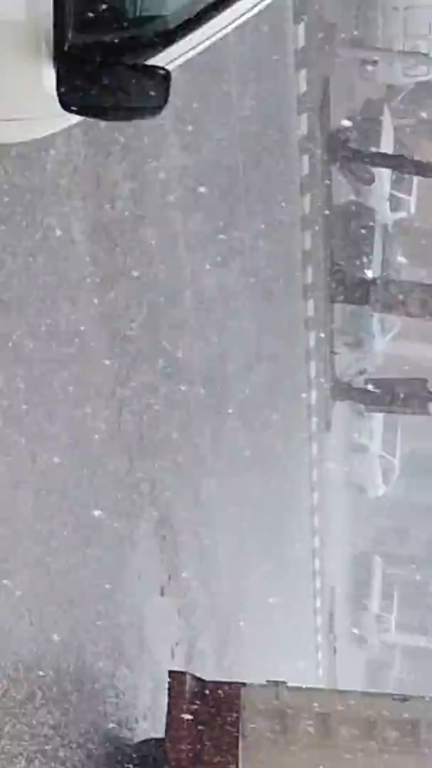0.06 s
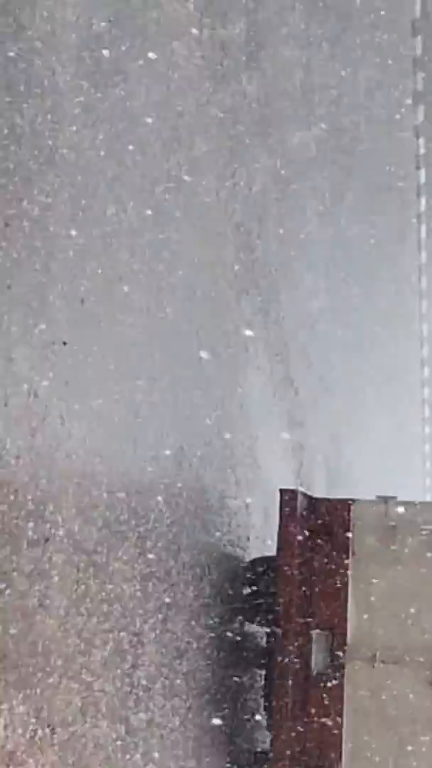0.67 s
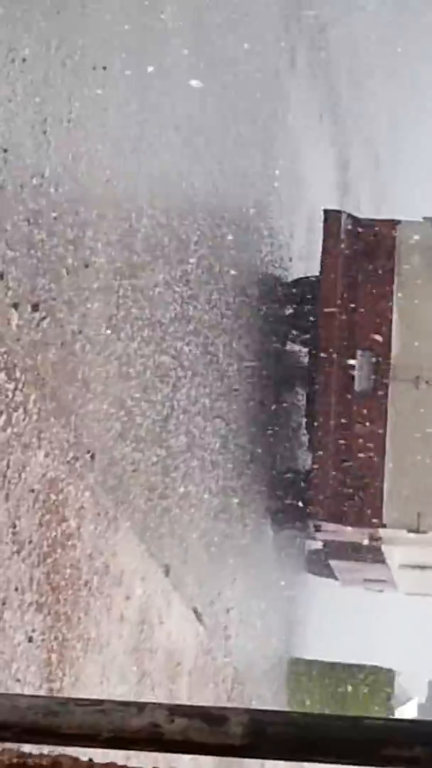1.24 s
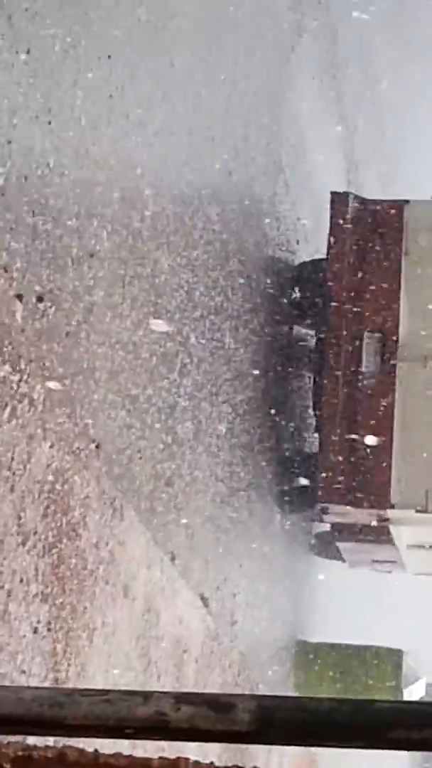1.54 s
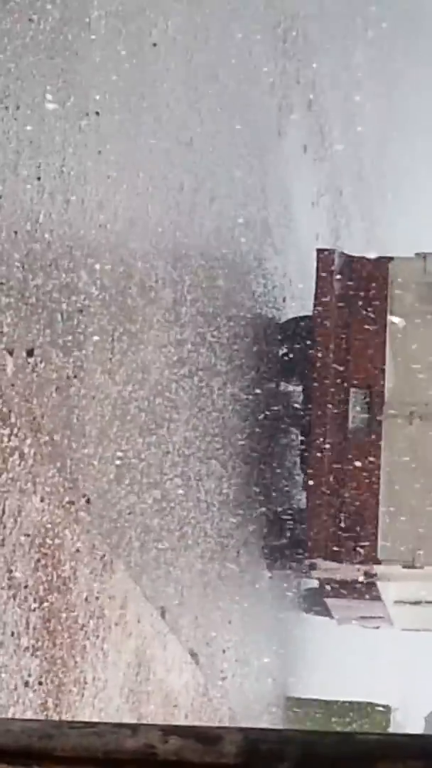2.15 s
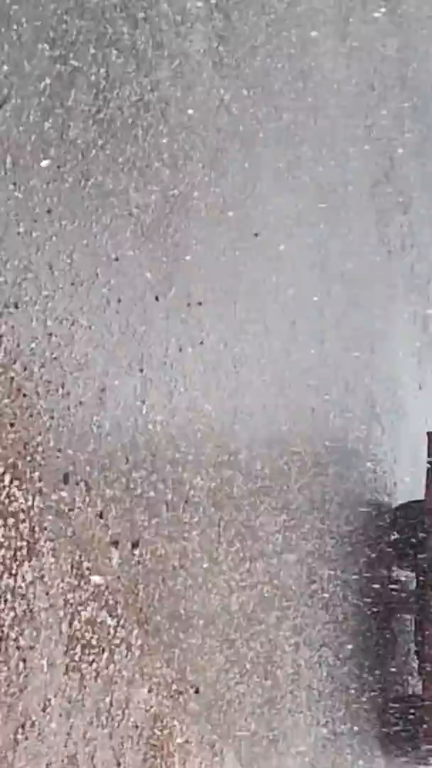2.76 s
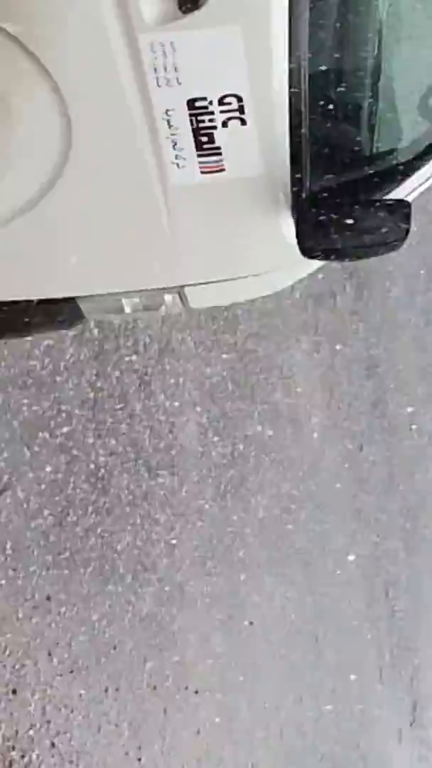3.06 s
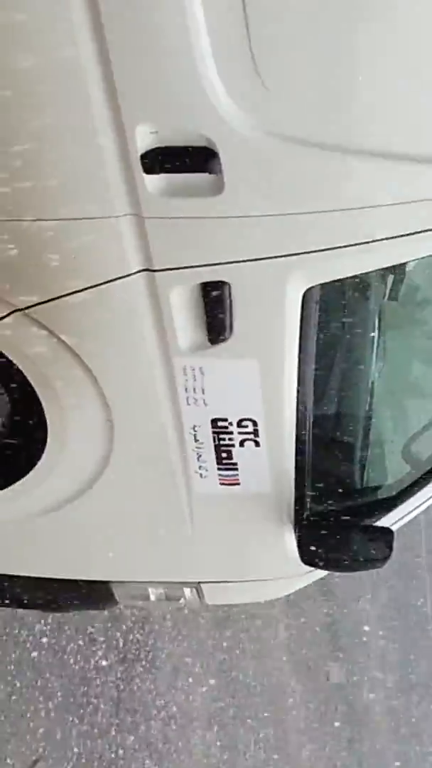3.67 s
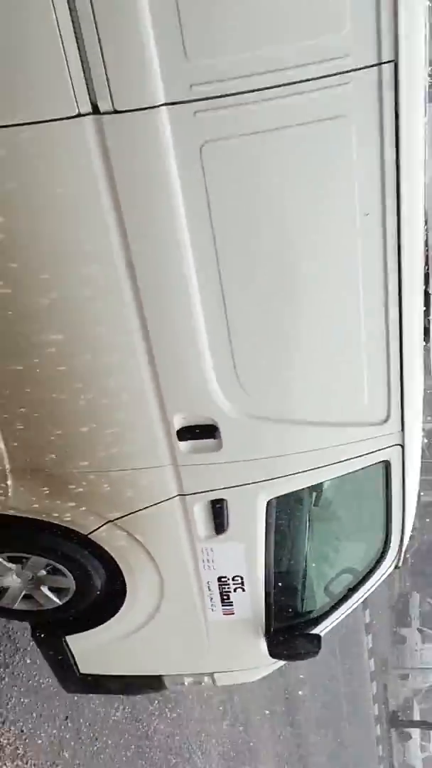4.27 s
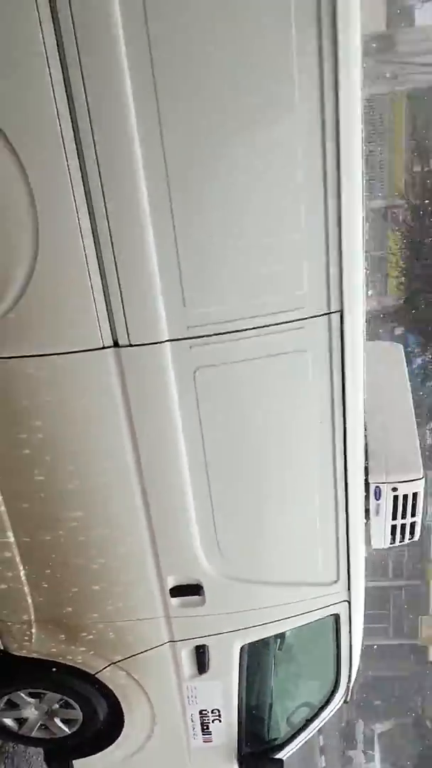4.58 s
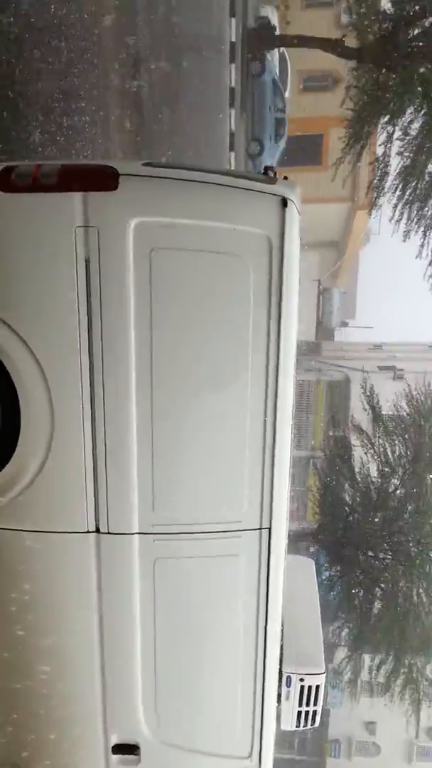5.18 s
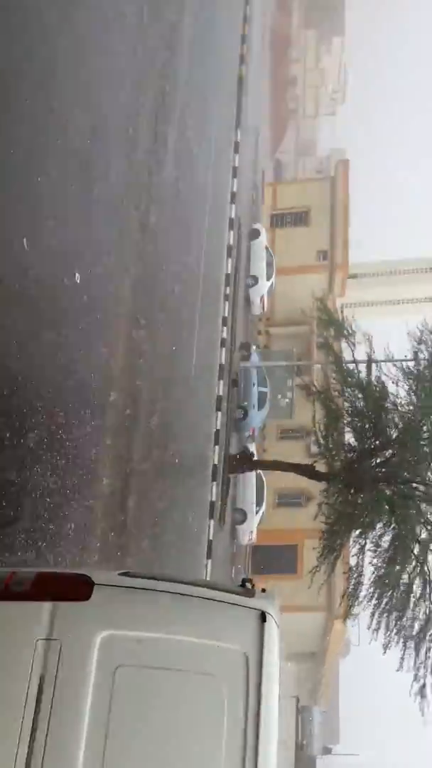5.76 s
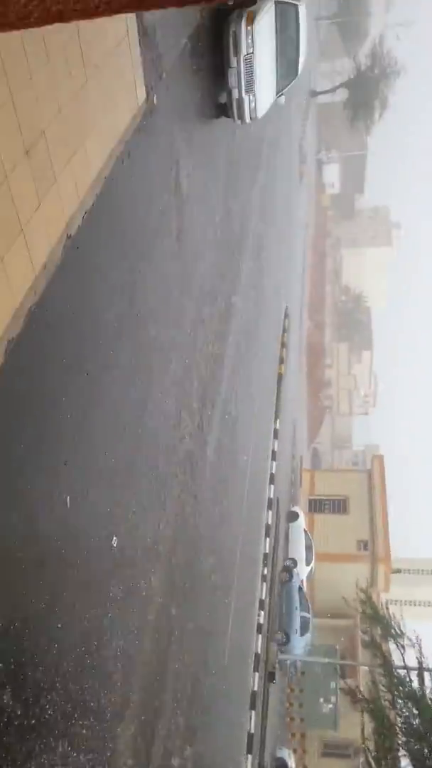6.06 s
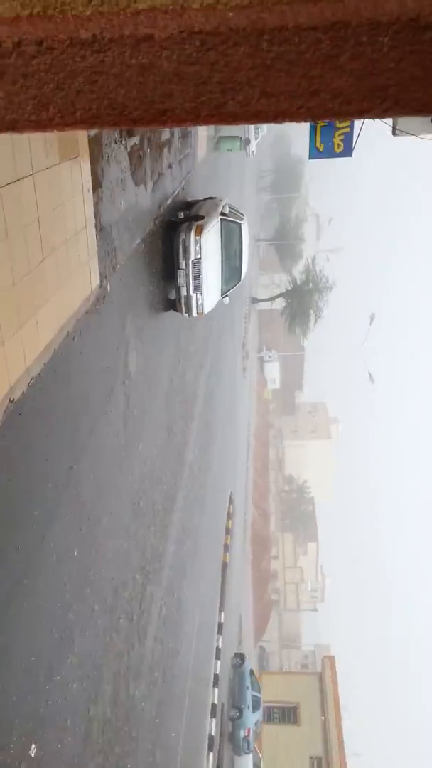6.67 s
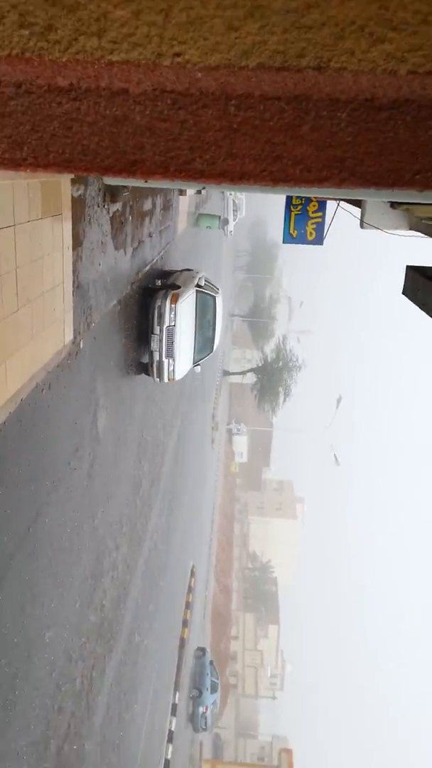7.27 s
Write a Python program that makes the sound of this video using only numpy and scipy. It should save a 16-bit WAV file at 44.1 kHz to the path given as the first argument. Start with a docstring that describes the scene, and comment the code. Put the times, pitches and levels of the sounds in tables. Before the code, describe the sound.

From under a porch, a street is heard in a downpour of hail and rain, with countless stones pattering on the road and on vehicles. Sharp nearby cracks and short metallic knocks stand out, the loudest clipping slightly. As the stereo microphone turns, the right side briefly brightens, the clatter goes a little hollow, then the right opens again. Finally, bright splinters of ice skip across the pavement on the left.

```python
"""Heavy hail and rain on a street, heard from under a porch through two microphones that turn.
From the start, thousands of stones a second crack on asphalt and drum on cars over a wash of rain,
while single stones shatter close by or knock on metal. Near 2.6 s the right side briefly opens to the
street and brightens. From about 3 to 5.5 s the clatter takes on a hollow tone. Then the left side turns
away, the right opens again, and from 6.5 s ice scatters on the left. The loudest cracks overload."""
import sys
import numpy as np
from scipy import signal
from scipy.fft import rfft, irfft, next_fast_len
from scipy.io import wavfile
from scipy.ndimage import uniform_filter1d

SR = 44100
rng = np.random.default_rng(int(sys.argv[2]) if len(sys.argv) > 2 else 0)


def wav_out(sig):
    """Save sig, one row per channel (or a flat mono array), as 16-bit PCM at SR to the path in sys.argv[1]."""
    wavfile.write(sys.argv[1], SR, np.round(np.clip(np.atleast_2d(sig).T, -1, 1) * 32767).astype(np.int16))


N = 323253
TIME = np.arange(N) / SR
TREBLE_LIMIT_HZ = 14800
# how far the right microphone is open to the street: time_s, share (0-1)
RIGHT_OPENING = [(0, 0.22), (.9, 0.03), (2.535, 0), (2.57, 0.97), (3.09, 0.6), (3.3, 0), (5.7, 0.07),
                 (5.77, 1), (6.5, 0.55), (6.9, 0.7), (7.11, 0.95), (7.165, 0.1)]


def gain_of(db):
    """Turns decibels into a number to multiply by."""
    return 10 ** (np.asarray(db) / 20)


def unit_level(x):
    """Scales a signal to an average power of 1."""
    return x / np.sqrt(np.mean(abs(x) ** 2) + 1e-20)


def at_pitch(table, hz, column=1):
    """Looks up a table by pitch, gliding between its rows."""
    columns = np.transpose(table)
    return np.interp(np.log(hz + 1), np.log(columns[0]), columns[column])


def at_time(table, t, column=1):
    """Looks up a table by time, gliding between its rows."""
    columns = np.transpose(table)
    return np.interp(t, columns[0], columns[column])


def band(hz, centre_hz, width=0.5):
    """A bell-shaped gain that favours pitches near the centre."""
    return np.exp(-np.log((hz + 1) / centre_hz) ** 2 / width)


def filtered(x, gain):
    """Turns each frequency up or down by gain(hz)."""
    size = next_fast_len(x.shape[-1], True)
    hz = np.fft.rfftfreq(size, 1 / SR)
    return irfft(rfft(x, size) * gain(hz), size)[..., :x.shape[-1]]


def wander(shape, steps):
    """A random curve that drifts over the given number of steps."""
    return unit_level(uniform_filter1d(rng.standard_normal(shape), size=steps, axis=-1))


def add(mix, start_s, sound):
    """Adds a stereo sound to the mix."""
    part = mix[:, round(start_s * SR):][:, :sound.shape[1]]
    part += sound[:, :part.shape[1]]


def impacts(per_s, spread_db):
    """Start samples and sizes of random hits, many small and a few large."""
    chance = rng.random(N)
    starts = np.flatnonzero(chance < per_s / SR)
    strength = -np.log(chance[starts] * SR / per_s + 1e-9)
    return starts, gain_of(spread_db * np.minimum(strength, 4))


def shower(stones, per_s, spread_db):
    """Plays one of the stone sounds, picked by chance, at every hit."""
    out, pick = np.zeros((2, N)), rng.integers(0, len(stones), N)
    for start, size in zip(*impacts(per_s, spread_db)):
        add(out, start / SR, size * stones[pick[start]])
    return unit_level(out)


def far_rain():
    """Countless distant drops blur into a hiss."""
    return rng.standard_normal((2, N))


def road(per_s=2800, crack_s=0.0013, echo=0.63, echo_s=0.0089, tone=0.28, ring_cycles=14):
    """Each stone on the asphalt gives a sharp crack, a short ring and a spray of echoes."""
    t, stones = np.arange(1200) / SR, []
    for hz in np.geomspace(1500, 9000, 90):
        fade = np.exp(-t / crack_s) + echo * np.exp(-t / echo_s)
        crack = rng.standard_normal((2, len(t))) * fade
        ring = np.sin(2 * np.pi * (hz * t + rng.random((2, 1)))) * np.exp(-t * hz / ring_cycles)
        stones.append(unit_level(crack) + tone * np.sqrt(hz / 4000) * unit_level(ring))
    return shower(stones, per_s, spread_db=3)


def car_panels(per_s=450, ring_cycles=5.9, count=80):
    """Stones hit roofs and bonnets; each patch of sheet metal rings for a few cycles."""
    t, hz = np.arange(3000) / SR, np.geomspace(250, 2200, count)[:, None, None]
    tones = np.sin(2 * np.pi * (hz * t + rng.random((count, 2, 1))))
    return shower(hz * tones * np.exp(-t * hz / ring_cycles), per_s, spread_db=0)


def pellets(per_s=420, click_s=0.00055, bounce=0.61, count=70):
    """Hard pellets a few steps away give a dry click and bounce once."""
    t, stones = np.arange(2400) / SR, []
    pitches = np.geomspace(3000, 12000, count)  # small pellets are brighter
    gaps, pans = rng.uniform(.003, .025, count), rng.uniform(.15, 2.0, count)
    for hz, gap_s, pan in zip(pitches, gaps, pans):
        hits = np.exp(-t / click_s) + bounce * (t > gap_s) * np.exp(-abs(t - gap_s) / click_s)
        click = filtered(hits * rng.standard_normal(len(t)), lambda f: band(f, hz))
        stones.append(np.sqrt(hz) * np.outer([np.cos(pan), np.sin(pan)], unit_level(click)))
    return shower(stones, per_s, spread_db=2.5)


def microphone_pair(spectrum, hz, bass_share=0.73, bass_hz=1200, side_share=0.26, lag_s=15 / SR):
    """Low sounds reach both microphones alike; clatter from the side reaches the left first."""
    left, right = spectrum
    side = side_share * band(hz, centre_hz=2700) * np.exp(-2j * np.pi * hz * lag_s)
    shared = bass_share / (1 + (hz / bass_hz) ** 4) + side
    shared = (shared / np.maximum(abs(shared), 1))[:, None]
    separate = np.sqrt(np.maximum(1 - abs(shared) ** 2, 0))
    return np.array([left, shared * left + separate * right])


def turning_db(hz, t, treble, bass_shade=0.43, turn_share=0.7):
    """Left and right level changes as the microphones turn."""
    # the left microphone turns away from the road: time_s, level_db
    left_shade = [(5.71, 0), (5.86, -2.5), (6.45, -2.5), (6.7, -5.5), (7, -2.5), (7.33, -0.5)]
    # what the right microphone gains when fully open: pitch_hz, level_db
    open_colour = [(90, -4), (300, 0.5), (900, -0.5), (1400, 2), (2300, 5), (3500, 3.5), (5500, 9),
                   (10500, 10), (14000, 21)]
    shade_db = at_time(left_shade, t)
    left_db = (bass_shade * (1 - treble) + treble) * shade_db  # low sounds bend round obstacles
    right_db = at_pitch(open_colour, hz)[:, None] * at_time(RIGHT_OPENING, t)
    clatter = band(hz, centre_hz=2250, width=0.1)[:, None]
    right_db -= turn_share * clatter * shade_db  # as the left turns away, the right faces the road
    return np.array([left_db, right_db])


def flurries_db(hz, t, treble, patchy_db=0.78, flurry_db=0.35, drum_db=0.83, sizzle_db=1.5):
    """The downpour swells and eases; its highest sizzle flickers most."""
    # slow strength of the downpour: time_s, car_drumming_db, road_clatter_db
    strength = [(0, -0.5, -1.1), (.4, -0.5, -1.1), (1, -1.2, -1.36), (1.8, 0, -1.04), (2.48, -1.5, -3),
                (2.62, 1, -2), (3.25, -1, -1), (3.9, -2.5, -1.4), (4.8, 0, -0.9), (5.6, 0.5, -0.8),
                (6, -1.5, -2.5), (6.55, 0.1, 0.4), (6.72, -2.5, -1.4), (7.02, .3, -1.2), (7.33, -1.5, -1.7)]
    patches = wander((len(hz), len(t)), steps=12)
    patches = unit_level(uniform_filter1d(patches, size=10, axis=0))  # nearby pitches move together
    flurries, drumming, sizzle = (wander(len(t), steps) for steps in (20, 36, 22))
    top = (hz ** 8 / (hz ** 8 + 11000 ** 8))[:, None]
    swell_db = (1 - treble) * (at_time(strength, t) + drum_db * drumming)
    swell_db += treble * at_time(strength, t, column=2)
    return swell_db + flurry_db * flurries + patchy_db * patches + sizzle_db * top * (sizzle + patches)


def unsteady_bass(sound, depth_db=6, below_hz=135):
    """The deepest rumble comes and goes a few times a second."""
    rumble = filtered(sound, lambda f: 1 / (1 + (f / below_hz) ** 8))
    swing = unit_level(uniform_filter1d(wander(N, steps=5000), size=1500))
    swell = unit_level(gain_of(depth_db * np.minimum(swing, 1)))
    return sound + rumble * (swell - 1)


def downpour(level_db=-12.5, rain_db=-.5, panel_db=-15.5, pellet_db=-10, treble_hz=1400):
    """Rain and hail all along the street merge into one swelling clatter."""
    # tone of the street at the two microphones: pitch_hz, left_db, right_db
    street = [(20, -50, -78), (87.5, -48, -30.5), (164, -23.5, -18), (297, -10, -9), (590, -9.5, -7.5),
              (780, -7, -5), (1280, -7.5, -6.5), (1970, -2.5, -6), (2700, 0, -5.5), (3430, -1.5, -3.5),
              (4600, -1.5, -7), (5880, -6.5, -15.5), (8930, -10.5, -19), (11070, -16.5, -24.5),
              (15000, -22, -51)]
    sound = gain_of(rain_db) * far_rain() + road()
    sound += gain_of(panel_db) * car_panels() + gain_of(pellet_db) * pellets()
    hz, t, spectrum = signal.stft(sound, SR, nperseg=512, noverlap=384)
    power = uniform_filter1d((abs(spectrum) ** 2).mean((0, 2)), size=3)
    spectrum /= np.sqrt(power)[:, None]  # all pitches equally strong, ready for the street's tone
    spectrum = microphone_pair(spectrum, hz)
    treble = (hz ** 4 / (hz ** 4 + treble_hz ** 4))[:, None]
    spectrum *= gain_of(flurries_db(hz, t, treble) + turning_db(hz, t, treble))
    sound = signal.istft(spectrum, nperseg=512, noverlap=384)[1][:, :N]
    sound = filtered(sound, lambda f: gain_of([at_pitch(street, f), at_pitch(street, f, column=2)]))
    return gain_of(level_db) * unit_level(unsteady_bass(sound))


def hollow_colour(per_s=120):
    """From about 3 to 5.5 s the clatter takes on a hollow tone near 400, 890 and 1650 Hz."""
    # the peaks of the hollow tone: pitch_hz, width_hz, level_db
    hollow_peaks = [(400, 43, -38), (890, 94, -33.5), (1654, 180, -33)]
    # how strong the hollow tone is: time_s, share (0-1)
    strength = [(2.8, 0.1), (3.4, 1), (5.0, 0.8), (5.8, 0.05), (6.2, 0.1)]
    t, out = np.arange(4000) / SR, np.zeros((2, N))
    for hz, width_hz, db in hollow_peaks:
        ping = np.sin(2 * np.pi * hz * t) * np.exp(-np.pi * width_hz * t) * (1 - np.exp(-hz * t))
        out += gain_of(db) * shower([np.array([ping, ping])], per_s, spread_db=2)
    return out * at_time(strength, TIME)


def splinters(level_db=-36, per_s=22, chip_s=.002, shade_db=-10):
    """Now and then a chip of ice ticks sharply on the pavement close by."""
    t, chips = np.arange(900) / SR, []
    for hz in np.geomspace(8000, 14000, 24):
        burst = np.exp(-t / chip_s) * rng.standard_normal((2, len(t)))
        chips.append(unit_level(filtered(burst, lambda f: band(f, hz))))
    right_db = shade_db * (1 - at_time(RIGHT_OPENING, TIME))
    return shower(chips, per_s, spread_db=3) * gain_of(level_db + np.array([np.zeros(N), right_db]))


def scattering_ice(per_s=1600, chip_s=0.0027, right_db=-19):
    """Ice skips over the pavement in tiny bright ticks, mostly on the left."""
    # loudness of the ice: time_s, level_db
    loudness = [(6.3, -57), (6.52, -26), (6.59, -20), (6.64, -18), (6.74, -19), (6.81, -15.5), (6.9, -21.5),
                (7.05, -19), (7.33, -16)]
    # tone of the ice: pitch_hz, level_db
    colour = [(100, -41), (3000, -31), (6500, -7), (8500, -0.5), (11000, -4.5), (14500, -11)]
    t, hits = np.arange(900) / SR, np.zeros(N)
    starts, sizes = impacts(per_s, spread_db=3)
    hits[starts] = sizes ** 2
    power = signal.oaconvolve(hits, np.exp(-2 * t / chip_s))[:N]  # each hit dies away
    ticks = np.sqrt(abs(power)) * rng.standard_normal((2, N))
    ticks = filtered(ticks, lambda f: gain_of(at_pitch(colour, f)))
    return unit_level(ticks) * gain_of(at_time(loudness, TIME)) * gain_of([[0], [right_db]])


def knocks(overtone=0.45, cycles_at_1khz=5.8):
    """A big stone makes a car panel ring briefly; small stiff panels ring for more cycles."""
    # big stones on panels: start_s, pitch_hz, level_db
    big_stones = [(.5, 3040, -10), (2.093, 2680, -6), (2.179, 3560, -8), (2.29, 536, -10), (2.59, 735, -7),
                  (2.624, 805, -14), (3.252, 317, -19), (5.04, 890, -14), (5.508, 307, -10),
                  (5.512, 515, -14), (5.678, 785, -13), (6.082, 1590, -13), (6.377, 2140, -10),
                  (6.531, 366, -15), (6.6, 335, -13), (6.66, 2010, -12)]
    t, out = np.arange(4000) / SR, np.zeros((2, N))
    for start_s, hz, db in big_stones:
        cycles = hz * t
        ring_cycles = cycles_at_1khz * (hz / 1000) ** 0.99
        ring = np.sin(2 * np.pi * cycles) + overtone * np.sin(4 * np.pi * cycles)
        knock = gain_of(db) * ring * np.exp(-cycles / ring_cycles) * (1 - np.exp(-2 * cycles))
        add(out, start_s, np.array([knock, knock]))
    return out


def near_stones(crack_s=0.0013, rise_s=0.00077, body_hz=3300, fizz_hz=10000, shade_db=-9):
    """A close stone cracks, then its chips settle in clumps; brighter stones splinter more."""
    # shattering stones: start_s, level_db, left_minus_right_db, settle_s, brightness (0-1)
    shatters = [(.476, -9.5, 6, 0.059, 0.2), (.499, -8, 9, 0.023, 0), (.559, -17, 5, .02, .9),
                (.891, -11, 6, .05, .3), (1.216, -23, 9, .04, .8), (2.056, -12.5, 13, 0.029, 0.2),
                (2.422, -8, 11, 0.025, 0.01), (2.616, -14, 2, .02, .5), (2.763, -18, 8, .2, .03),
                (3.047, -10, 0, 0.029, 0.8), (3.059, -15, 7, .033, .8), (3.528, -18, 14, .03, .7),
                (3.605, -17, 14, .15, 0.07), (3.641, -10, 9, 0.072, 0), (3.68, -7.5, 8, 0.022, 0),
                (4.302, -14, 8, .06, 0.5), (5.652, -14.5, 8, .2, 0.4), (5.962, -6.5, 2, 0.049, .04),
                (6.613, -15, 14, .04, .9), (6.632, -16.5, 16, 0.065, 0.8), (6.656, -18, 21, .035, .92),
                (6.692, -15, 17, 0.015, .95), (6.717, -10, 14, 0.018, .97), (6.796, -17, 16, 0.055, .85),
                (6.829, -18, 18, .035, 0.9)]
    t, out = np.arange(8192) / SR, np.zeros((2, N))
    for start_s, db, pan_db, settle_s, brightness in shatters:
        body, fizz = rng.standard_normal((2, 2, len(t)))
        body = unit_level(filtered(body, lambda f: band(f, body_hz, width=0.78)))
        fizz = unit_level(filtered(fizz, lambda f: band(f, fizz_hz, width=1.2) * (f < TREBLE_LIMIT_HZ)))
        # when shaded, the right microphone misses some of the highest sounds
        fizz[1] *= gain_of(shade_db * (1 - at_time(RIGHT_OPENING, start_s)))
        clumps = unit_level(uniform_filter1d(rng.exponential(1, len(t)) ** 4, size=60))
        chips = np.sqrt(abs(clumps)) * gain_of(-25 * t / settle_s)
        loudness = (np.exp(-t / crack_s) + chips) * (1 - np.exp(-t / rise_s))
        stone = loudness * (np.sqrt(1 - brightness) * body + np.sqrt(brightness) * fizz)
        add(out, start_s, stone * gain_of(db + np.array([[pan_db], [-pan_db]]) / 2))
    return out


def scene():
    """The whole street."""
    return downpour() + hollow_colour() + scattering_ice() + splinters() + near_stones() + knocks()


def record(dry, ceiling=0.98):
    """Overload flattens the tallest peaks; then the highest treble is cut."""
    clipped = np.clip(dry, -ceiling, ceiling)
    treble_cut = signal.firwin(511, TREBLE_LIMIT_HZ, window=("kaiser", 8), fs=SR)
    return signal.oaconvolve(clipped, treble_cut[None], "same")


dry = scene()
out = record(dry)
wav_out(out)
```